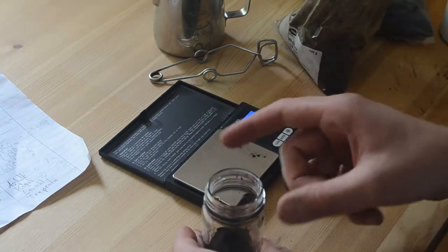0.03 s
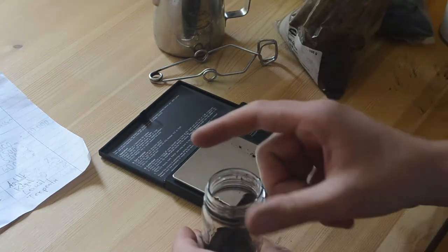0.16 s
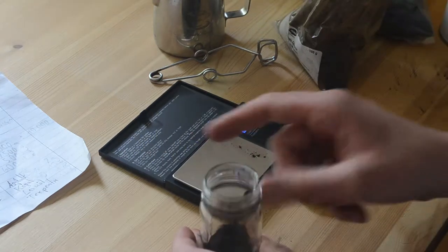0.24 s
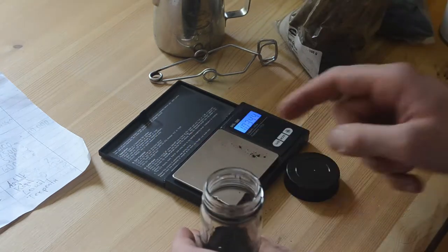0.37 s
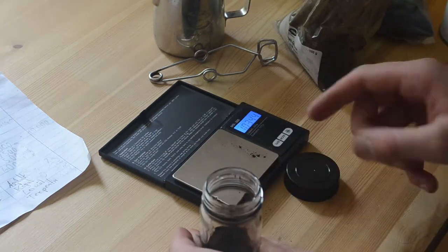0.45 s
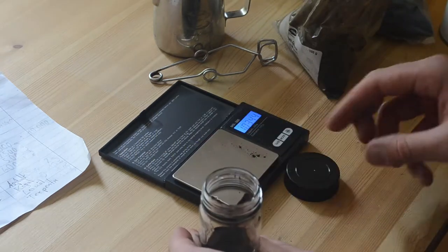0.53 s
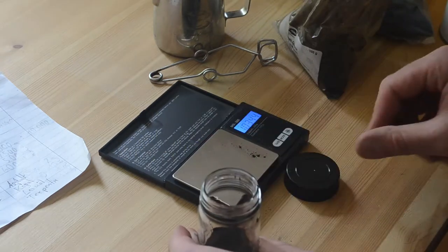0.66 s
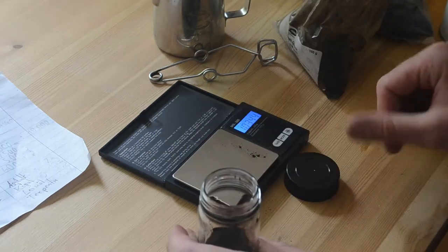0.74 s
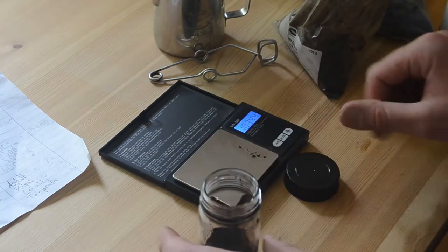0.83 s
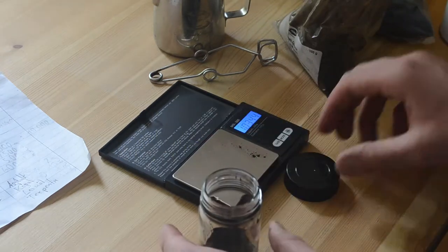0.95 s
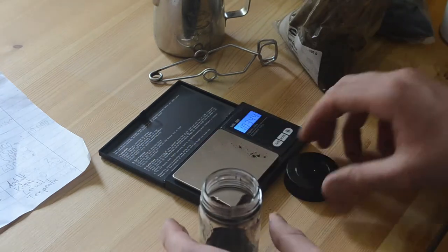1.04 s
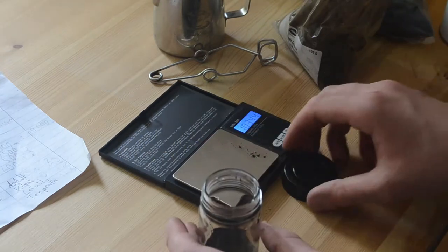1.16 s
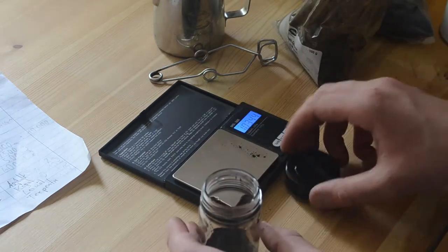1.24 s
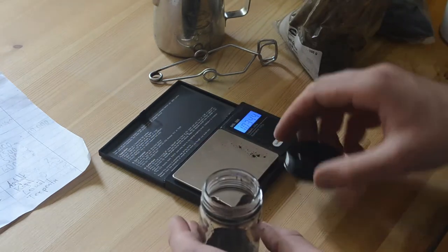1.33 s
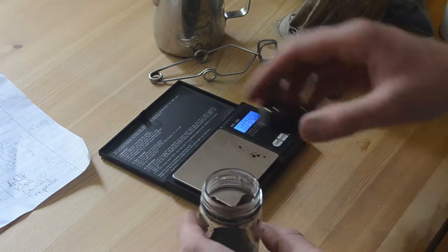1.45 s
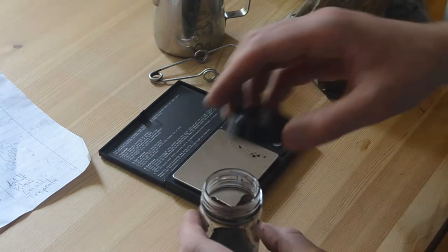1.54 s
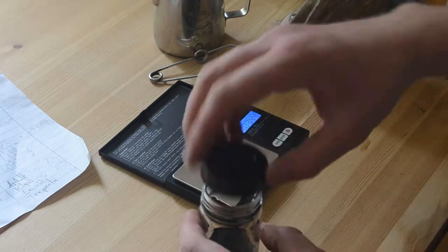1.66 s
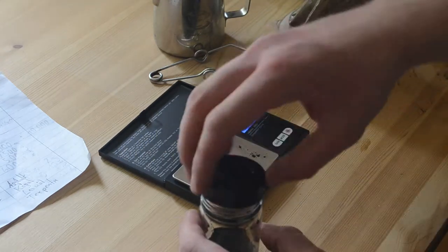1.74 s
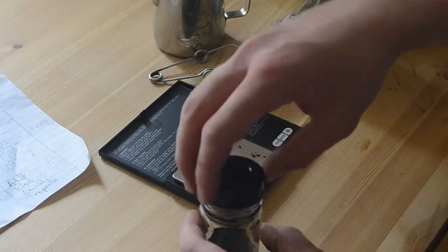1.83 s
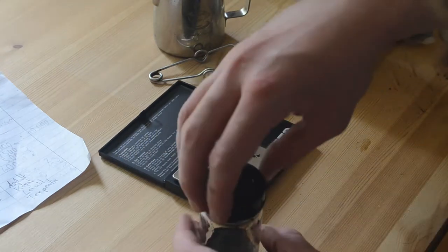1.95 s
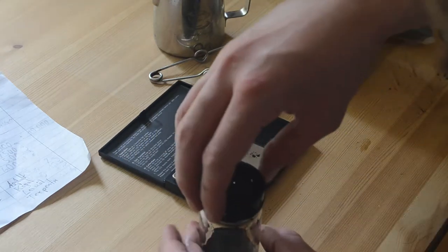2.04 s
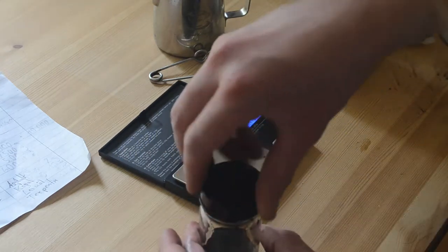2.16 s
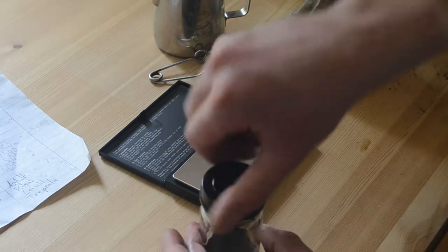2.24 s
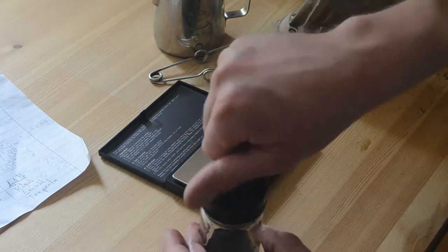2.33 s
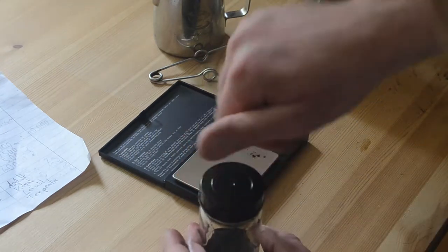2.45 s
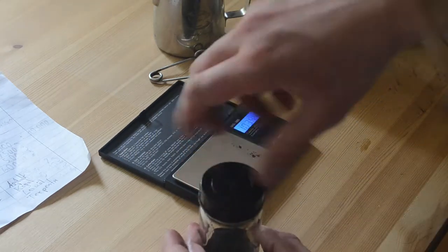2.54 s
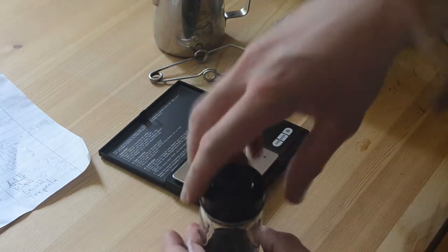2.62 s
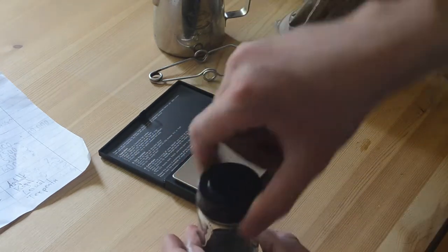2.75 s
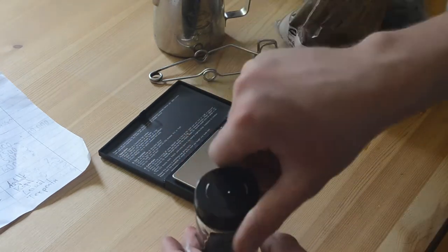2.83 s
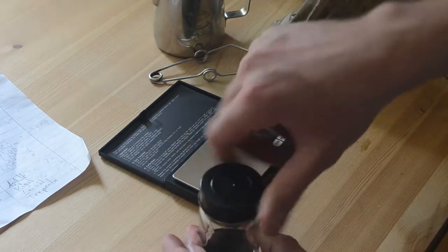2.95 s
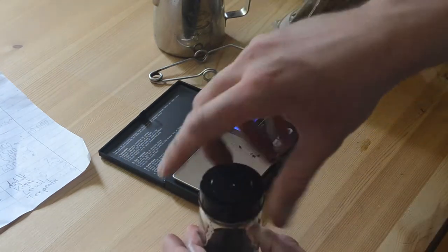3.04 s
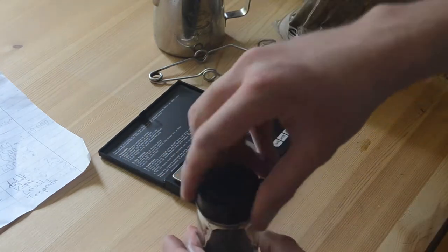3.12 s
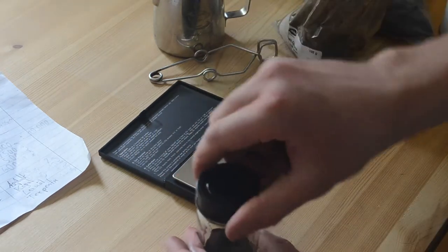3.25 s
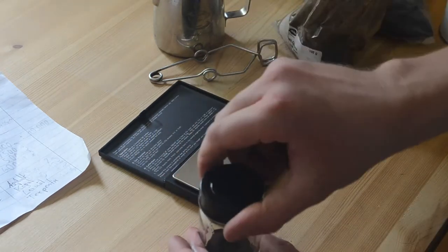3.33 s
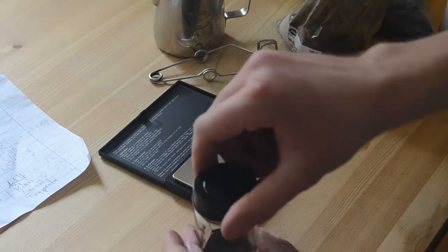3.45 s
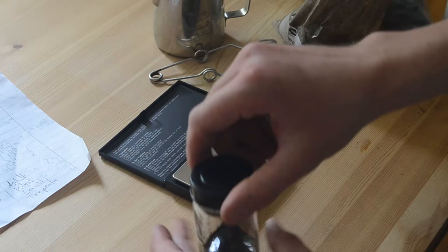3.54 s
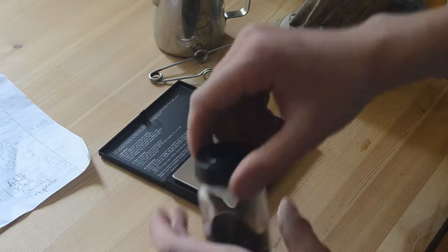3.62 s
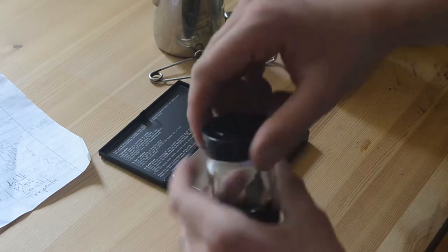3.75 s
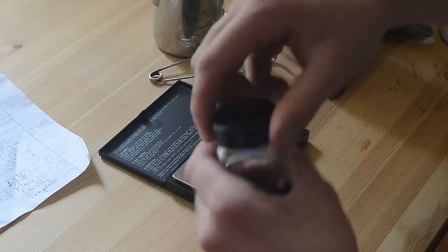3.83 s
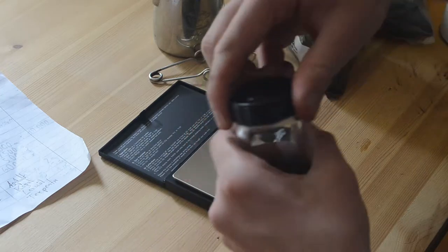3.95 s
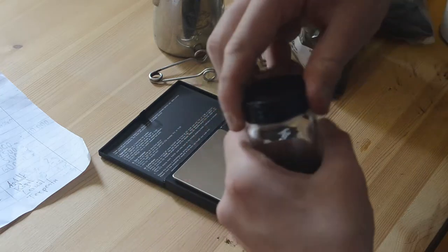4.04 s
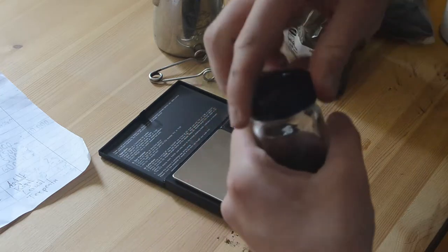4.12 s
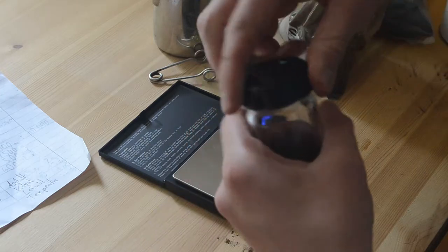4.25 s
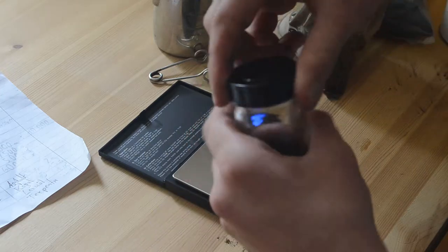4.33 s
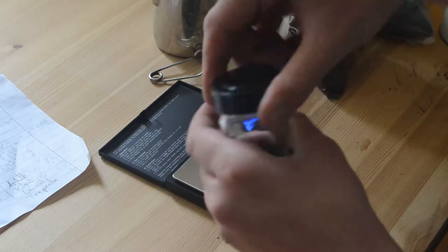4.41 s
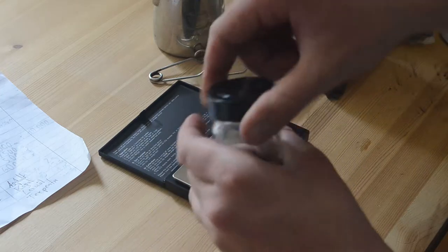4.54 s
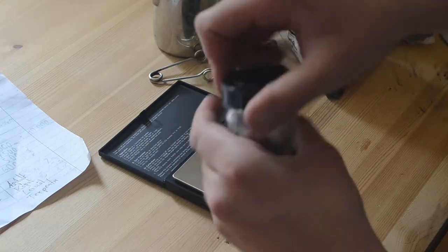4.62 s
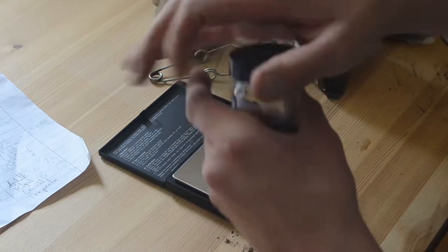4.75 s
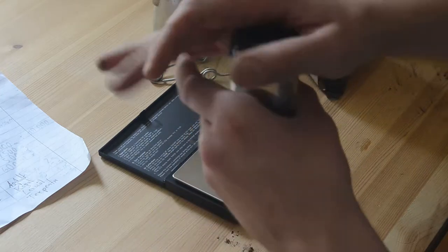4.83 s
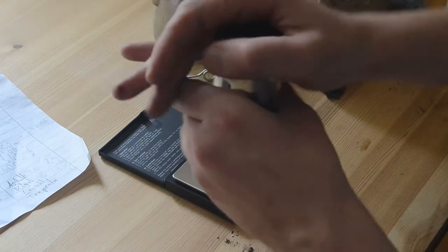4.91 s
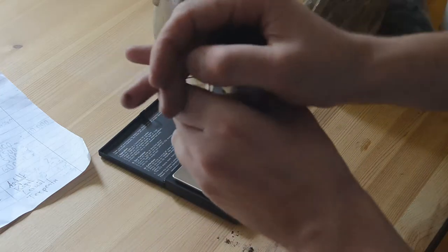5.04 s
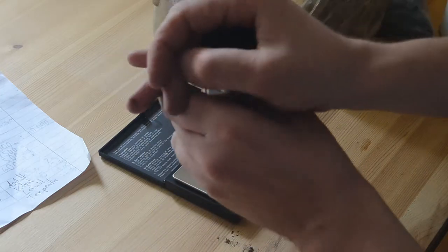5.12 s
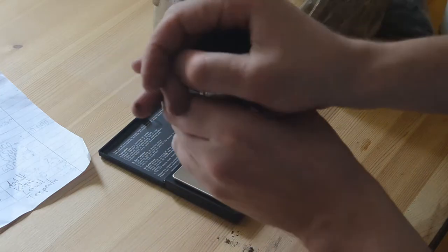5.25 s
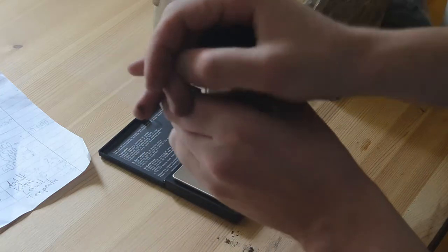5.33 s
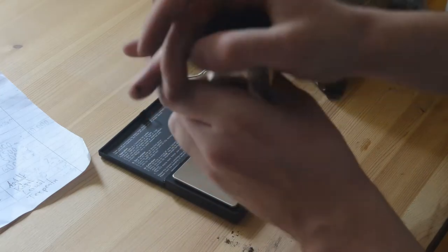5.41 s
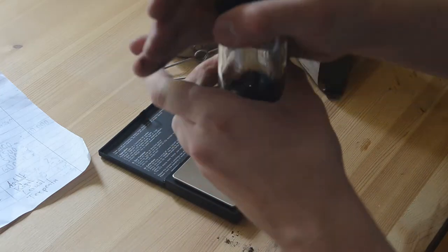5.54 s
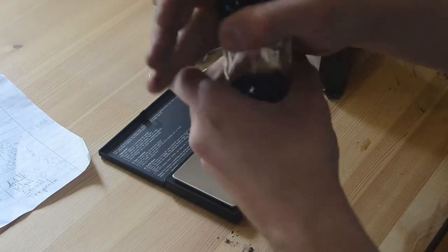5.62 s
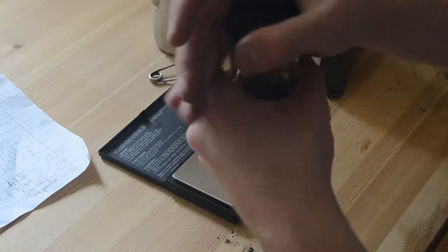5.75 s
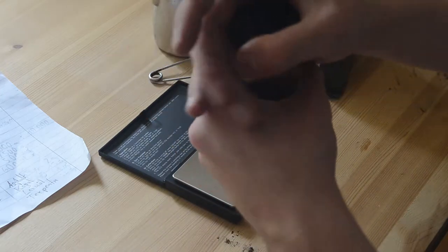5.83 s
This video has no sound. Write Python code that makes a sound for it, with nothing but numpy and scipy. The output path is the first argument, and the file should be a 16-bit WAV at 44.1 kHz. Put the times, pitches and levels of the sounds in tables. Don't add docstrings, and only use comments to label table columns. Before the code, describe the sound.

Close dull jar knock on wood, plastic lid dropping with sharp clacks and a quick rattle, then quiet screwing scrapes over faint hum.

```python
import sys
import numpy as np
from scipy import signal
from scipy.fft import rfft, irfft
from scipy.io import wavfile
from scipy.ndimage import uniform_filter1d

SR = 44100
rng = np.random.default_rng(int(sys.argv[2]) if len(sys.argv) > 2 else 0)


def makeup_ratio(level_db):
    decades = np.asarray(level_db, float) / 20
    return 10 ** decades


def to_wav(sig):
    pcm = np.clip(np.atleast_2d(sig), -1, 1) * 32767
    pcm = np.round(pcm).astype(np.int16)
    wavfile.write(sys.argv[1], SR, pcm.T)


N = 259158


def band(x, hz, width_hz):
    return signal.lfilter(*signal.iirpeak(hz, hz / width_hz, fs=SR), x)


def level(x, db):
    return x * makeup_ratio(db) / np.sqrt(np.mean(x ** 2))


def walk(rate_hz):
    hold = int(SR / rate_hz)
    steps = np.repeat(rng.standard_normal(N // hold + 1), hold)
    return 1.3 * uniform_filter1d(uniform_filter1d(steps, hold), hold)[:N]


def air():
    # (frequency [Hz], density [dB per Hz])
    hiss_spectrum = [(20, -36.5), (40, -20), (100, -16), (160, -11.5), (250, -12.5), (300, -9.5), (350, -6),
                     (400, -13.5), (1100, -17.5), (3200, -25), (6300, -28.5), (8500, -32), (10000, -40),
                     (15600, -46)]
    f = np.maximum(np.fft.rfftfreq(N, 1 / SR), 1)
    hz, db = np.transpose(hiss_spectrum)
    shape = makeup_ratio(np.interp(np.log(f), np.log(hz), db))
    bass_share = 1 / (1 + (f / 500) ** 2)
    bass, treble = rng.standard_normal((2, N))
    bass = bass * makeup_ratio(0.74 * walk(4.6))
    treble = treble * makeup_ratio(1.3 * walk(7.2))
    hiss = irfft(shape * (np.sqrt(bass_share) * rfft(bass) + np.sqrt(1 - bass_share) * rfft(treble)), N)
    hum_hz = 204.5 + 0.5 * walk(7.2)
    hum = makeup_ratio(1.5 * walk(12)) * np.sin(2 * np.pi * np.cumsum(hum_hz) / SR)
    return level(hiss, -64) + level(hum, -68.5)


def room(x, gap_s=0.0016):
    # (frequency [Hz], t60 [s])
    room_t60 = [(120, 0.39), (250, 0.27), (1000, 0.2), (3000, 0.13), (6000, 0.32), (12000, 0.067)]
    t = np.arange(int(.45 * SR)) / SR
    hz, t60_s = np.transpose(room_t60)
    noise = makeup_ratio(1.8 * walk(300)[:len(t)]) * rng.standard_normal(len(t))
    tail = np.zeros(len(t))
    for f in 90 * 2. ** np.arange(8):
        octave_t60_s = np.interp(np.log(f), np.log(hz), t60_s)
        tail += band(noise, f, f / 0.9) * 1000. ** (-t / octave_t60_s)
    tail = tail * (1 + 0.27 * np.exp(-t / 0.048))
    tail = tail * np.clip(t / gap_s - 1, 0, 1)
    power = np.abs(rfft(tail)) ** 2
    fine = uniform_filter1d(uniform_filter1d(power, size=30), size=30)
    even = np.sqrt(uniform_filter1d(power, size=500) / fine)
    fade_out = np.clip((t[-1] - t) / 0.08, 0, 1) ** 2
    tail = irfft(rfft(tail) * even, len(t)) * (t > gap_s) * fade_out
    return signal.fftconvolve(x, tail / np.sqrt(np.sum(tail ** 2)))[:N]


def rubs():
    # (frequency [Hz], width [Hz])
    peaks = [(1350, 900), (2350, 800), (4000, 800), (7700, 1900)]
    # (start [s], length [s], level [dB], dryness [dB])
    strokes = [(0.432, 0.07, -71.5, 11), (0.61, 0.17, -80, 16.5), (0.814, 0.078, -81, 20),
               (1.125, 0.13, -56, -3.5), (1.862, 0.05, -60, -8), (2.082, 0.12, -50.5, 1),
               (2.193, 0.093, -49.5, 0.5), (2.258, 0.11, -56.5, 0.5), (2.772, 0.059, -52.5, 4.5),
               (2.887, 0.068, -61.5, -26), (3.139, 0.13, -61, -2), (3.492, 0.068, -56, -14),
               (3.9, 0.092, -64.5, -3), (4.23, 0.21, -64, 2), (4.54, 0.08, -67, 12), (4.71, 0.35, -71, 7.5),
               (4.89, 0.15, -72.5, 7.5)]
    # (start [s], level [dB], fade [dB/s], dryness [dB])
    skids = [
        (1.108, -49.5, 400, -13),
        (1.895, -44, 700, 3),
        (1.93, -46, 263, -16),
        (2.69, -41, 253, -1),
        (2.76, -55, 500, -17),
        (3.61, -52, 350, -3),
        (4.1, -58.5, 198, -1),
        (4.64, -70.5, 112, 17),
        (5.42, -63, 110, 11),
    ]
    rise_share, fall_share, skid_rise_s = 0.24, 0.45, 0.0043
    base_db = np.array((-0.5, -8, -8, -10))
    dry_share = np.array((0, 0.25, 0.7, 1))
    t = np.arange(N) / SR

    def colour(db, dry_db):
        return makeup_ratio(db + base_db + dry_db * dry_share)[:, None]

    gains = np.zeros((len(peaks), N))
    for s, length_s, db, dry_db in strokes:
        u = (t - s) / length_s
        gains += colour(db, dry_db) * np.clip(np.minimum(u / rise_share, (1 - u) / fall_share), 0, 1)
    for s, db, fade_db, dry_db in skids:
        u = np.maximum(t - s, 0)
        gains += colour(db, dry_db) * np.minimum(u / skid_rise_s, 1) * makeup_ratio(-fade_db * u)
    slips = rng.random(N) < 1500 / SR
    slips = slips * makeup_ratio(2.3 * rng.exponential(size=N)) * rng.standard_normal(N)
    drag = level(slips, -5.0) + rng.standard_normal(N)
    drag = drag * makeup_ratio(2 * walk(70))
    out = np.zeros(N)
    for gain, (hz, width_hz) in zip(gains, peaks):
        out += gain * level(band(band(drag, hz, width_hz), hz, 2 * width_hz), -2.1)
    return out


def swing(modes, detune, rise_cycles):
    hz, db, t60_s = np.transpose(modes)[:, :, None]
    t = np.arange(int(SR * min(.45, t60_s.max()))) / SR
    swell = (1 - np.exp(-t * hz / rise_cycles)) ** 2
    return makeup_ratio(db - 60 * t / t60_s) * np.sin(2 * np.pi * hz * (1 + detune) * t) * swell


def hits(rows, parts, modes, ring_db, spread_db, rise_cycles, follow):
    out = np.zeros(N + SR)
    chance = rng.standard_normal((len(rows), 2, 40))
    home = np.array([np.argmin([abs(np.log(m[0] / p[1][0])) for p in parts]) for m in modes])
    split = rng.uniform(0.014, 0.036, (len(modes), 1)) * rng.choice([-1, 1], (len(modes), 1))
    rings = swing(modes, 0, rise_cycles) - makeup_ratio(-1.5) * swing(modes, split, rise_cycles / 4)
    for (s, db, *rel_db, pitch_hz), (shift, share) in zip(rows, chance):
        i = int(s * SR)
        part_db = db + np.array([0, *rel_db])
        ring = makeup_ratio(part_db[home] + ring_db + spread_db * share[:len(modes)]) @ rings
        out[i:i + len(ring)] += ring
        for k, part in enumerate(parts):
            bend = (pitch_hz / part[1][0]) ** follow - 1 if k == 0 else 0
            detune = bend + 0.048 * shift[3 * k:3 * k + 3, None]
            y = swing(part, detune, rise_cycles).sum(axis=0)
            out[i:i + len(y)] += makeup_ratio(part_db[k]) * y / np.abs(y).max()
    return out[:N]


def jar_thuds():
    # (time [s], peak [dB], boom [dB re peak], edge [dB re peak], pitch [Hz])
    knocks = [
        (0.009, -51, -9, -23, 527),
        (0.245, -50.5, -0.5, -3.5, 535),
        (0.29, -4.5, -15.5, -10, 820),
        (0.294, -12, -10.5, -6, 820),
        (0.785, -58, 4.5, -9, 630),
        (2.3928, -19.5, -6.5, -12.5, 650),
        (2.407, -42.5, -10, -13, 670),
        (2.496, -52.5, -12.5, -24, 517),
        (2.9458, -28.5, -4.5, -10.5, 581),
        (3.516, -39, -10, -33, 907),
    ]
    # (frequency [Hz], level [dB], t60 [s])
    swings = [
        [(517, 2.5, .011), (757, 0, .008), (938, 3, 0.0067)],
        [(161, -11, 0.088), (345, -1, 0.038), (424, 2.5, 0.042)],
        [(1352, -0.5, 0.024), (1718, 1, 0.0076), (2070, -5.5, 0.012)],
        [(3000, -3, 0.0043), (4200, 0.5, 0.0043), (6030, -3.5, 0.0035)],
    ]
    # (frequency [Hz], level [dB], t60 [s])
    table_modes = [(163, -15.5, 0.35), (303, -6, 0.53), (335.7, 4.5, 0.28), (390, 8, .2), (436, 5, .22),
                   (477, -5, .2), (544, -5, 0.2), (581, -1.5, 0.23), (668, -5, .22), (854, -0.5, 0.26),
                   (907, 4.5, 0.1977), (960, -9, .17), (1157, -6.5, 0.15), (1279, -9, .2), (1498, -4, .2),
                   (1730, 3.5, 0.11), (1970, -8, 0.15)]
    tick_db = -31
    rows = [(s, db, boom, edge, tick_db, hz) for s, db, boom, edge, hz in knocks]
    return hits(rows, swings, table_modes, ring_db=-27, spread_db=2.5, rise_cycles=1.0, follow=0.6)


def lid_clacks():
    # (time [s], shell peak [dB], cavity [dB re peak], hardness [dB], pitch [Hz])
    drops = [(1.7175, -10, -17, -13, 2500), (1.7231, -14.5, -5.5, -12, 2490), (1.7364, -27.5, 1, -1, 2260),
             (1.7954, -36.5, -2, -11, 2280), (1.8581, -43, 0.5, -8.5, 2480), (1.8971, -31, 1, -1.5, 2400),
             (1.9217, -32.5, -13, -10, 2650), (1.9359, -31, -7.5, -7, 2500), (1.9434, -41.5, 7, -1, 2310),
             (2.3982, -24, -8, -10, 2070), (2.4064, -36, 10.5, -28, 2140), (2.6454, -7, -11.5, -7, 2180),
             (2.6534, -22.5, -6.5, -18.5, 1920), (2.6704, -29.5, -14, -7, 2250),
             (2.6786, -37, 2, -16.5, 2350), (2.6862, -13, -16, -19.5, 2290), (2.6984, -30, 2.5, -2.5, 2280)]
    # (time [s], peak [dB], cavity [dB], hardness [dB], pitch [Hz])
    brush = [(2.6375, -44, 0, -13.5, 2258)]
    # (time [s], peak [dB], cavity [dB], hardness [dB], pitch [Hz])
    catches = [(1.1063, -44.5, -9.5, -2, 2120), (1.3774, -67.5, 0, 11.5, 1380),
               (2.2395, -31, -6.5, -10, 1400), (2.3371, -43, -9, -15, 2050), (2.7599, -31.5, -5, -38, 1470),
               (3.6109, -49, 1.5, 1, 1490), (4.1081, -49, -19, 1.5, 2360), (4.3194, -49.5, -29, -17, 2460),
               (4.644, -65, -11, 11, 1446), (5.4257, -49, -10, 4, 2100), (5.4824, -56.5, -20, -0.5, 2846)]
    # (frequency [Hz], level [dB], t60 [s])
    swings = [
        [(2120, -6, 0.0078), (2350, 3.5, 0.011), (2610, -2.5, 0.0083)],
        [(595.6, 0.5, 0.019), (697, 0, 0.017), (845, -1.5, 0.017)],
        [(3124, -2, 0.0066), (4210, 0.88, 0.0065), (4760, -1.98, 0.0036)],
        [(6424, -0.5, 0.0072), (8120, 0.5, 0.0053), (9770, -2, 0.00256)],
    ]
    # (frequency [Hz], level [dB], t60 [s])
    lid_modes = [(580, -5, 0.21), (620, -3.5, .2), (690, 11.5, 0.17), (851.5, -5, 0.15), (2050, -2.5, 0.15),
                 (2095, 1, 0.13), (2170, -4, 0.23), (2500, -7, .16), (2433, 1.5, 0.1595), (2670, -2.5, .16),
                 (2700, -7, 0.062)]
    rim_db, tick_db = -0.1, -4.5
    rows = [(s, db, cavity, rim_db + hard, tick_db + hard, hz)
            for s, db, cavity, hard, hz in brush + sorted(drops + catches)]
    return hits(rows, swings, lid_modes, ring_db=-31, spread_db=4.0, rise_cycles=0.96, follow=0.928)


def scene():
    slide = rubs()
    thuds = jar_thuds()
    clacks = lid_clacks()
    echo = room(makeup_ratio(-5.5) * thuds + makeup_ratio(-8.0) * clacks + makeup_ratio(-12.5) * slide)
    heard = thuds + clacks + slide + echo
    mic = signal.butter(2, [175, 11200], "band", fs=SR, output="sos")
    return (signal.sosfilt(mic, heard) + air())[None, :]


def band_limit(x):
    return signal.sosfilt(signal.butter(12, 15740, fs=SR, output="sos"), x)


def record(dry):
    # (frequency [Hz], width [Hz], depth [0-1])
    notches = [(5655, 324, 0.8), (6800, 150, 0)]
    x = dry
    for hz, width_hz, depth in notches:
        x = x - depth * band(x, hz, width_hz)
    return band_limit(x)


dry = scene()
out = record(dry)
to_wav(out)
```